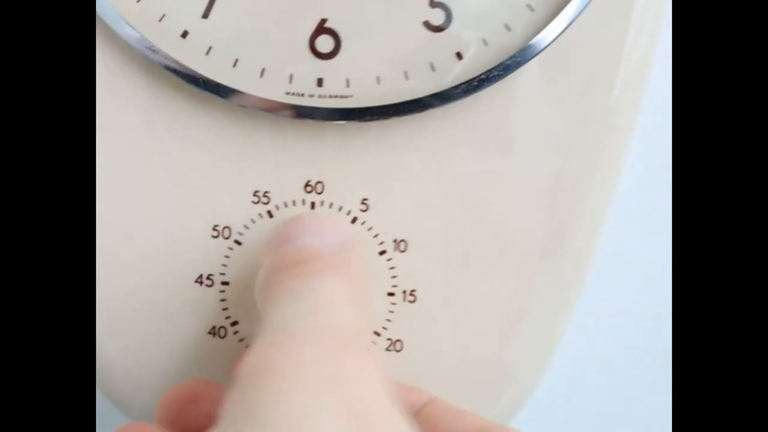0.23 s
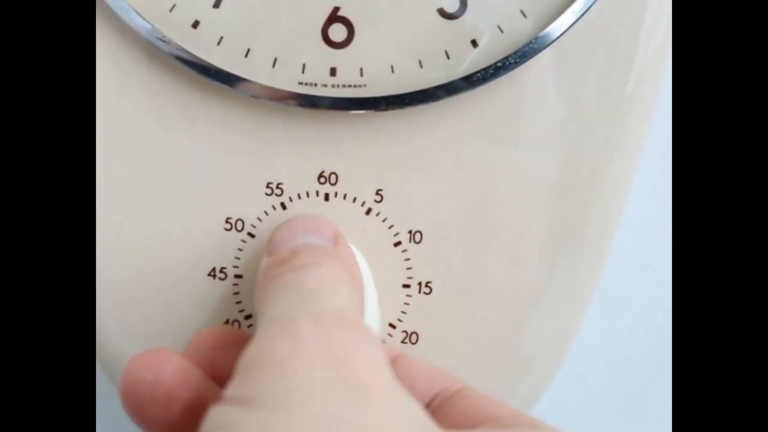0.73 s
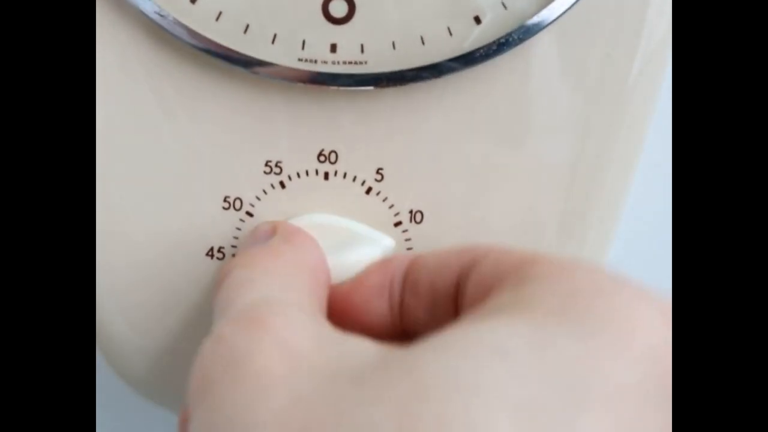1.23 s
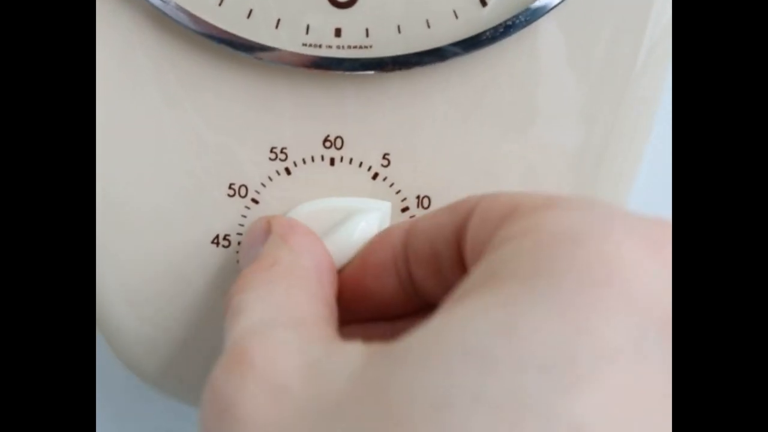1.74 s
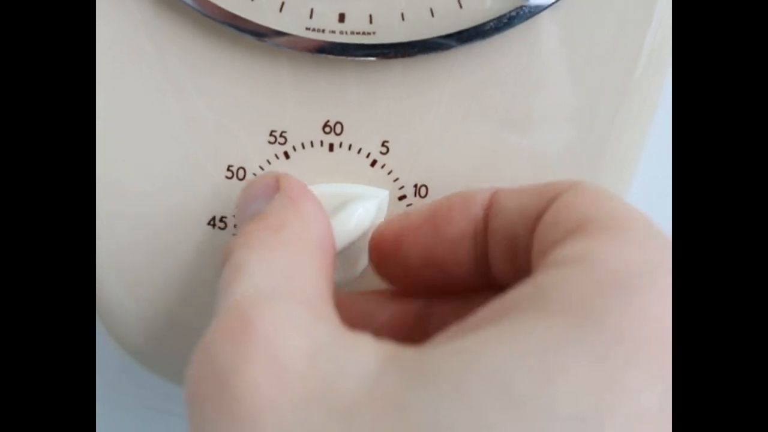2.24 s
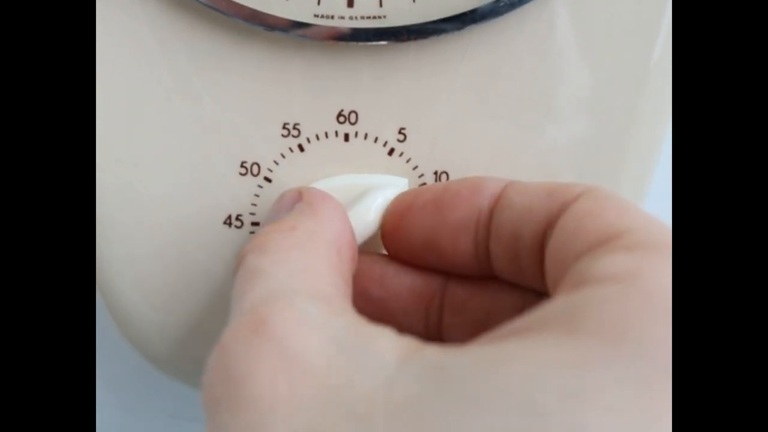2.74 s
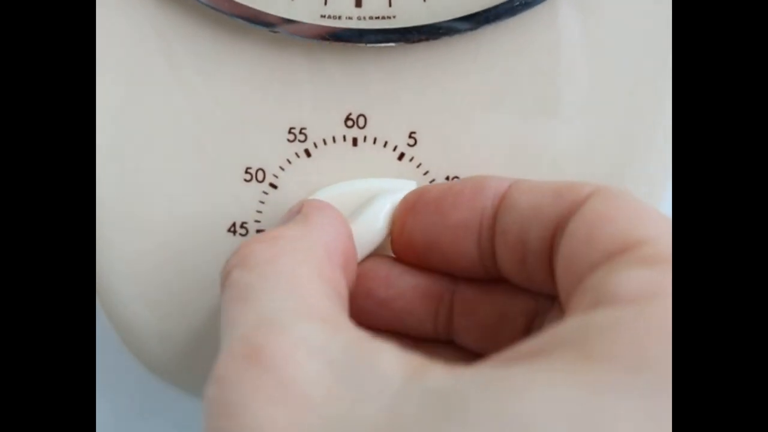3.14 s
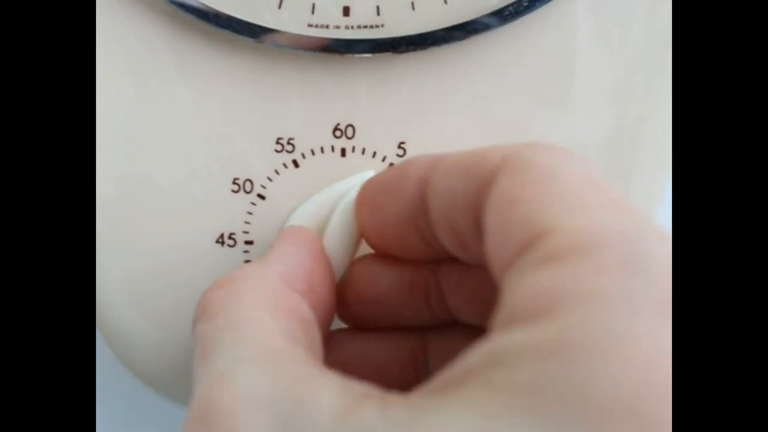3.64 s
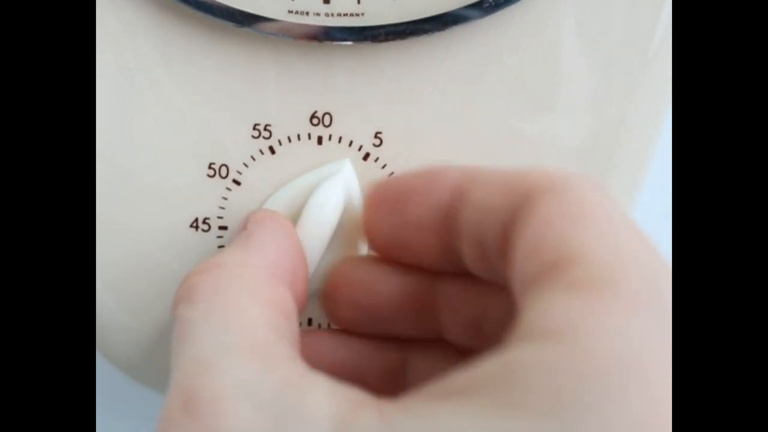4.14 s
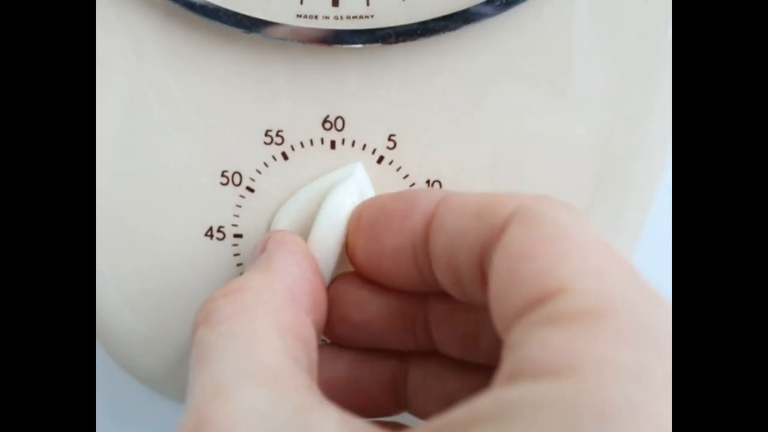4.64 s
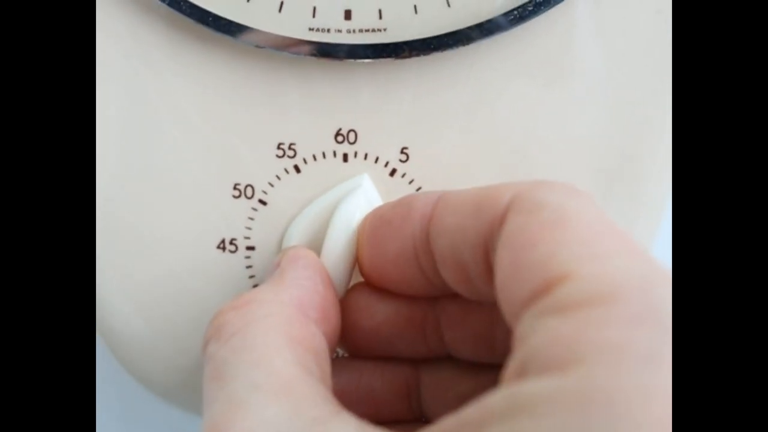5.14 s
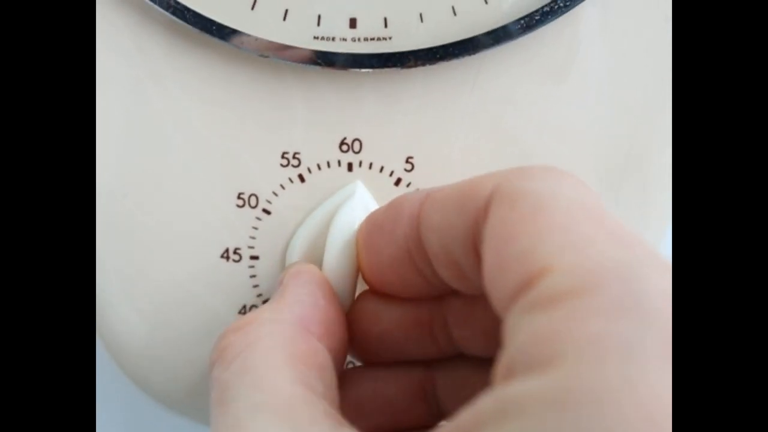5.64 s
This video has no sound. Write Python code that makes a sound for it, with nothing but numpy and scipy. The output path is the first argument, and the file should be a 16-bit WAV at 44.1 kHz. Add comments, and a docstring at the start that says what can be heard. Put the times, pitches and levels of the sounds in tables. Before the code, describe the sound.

Close stereo pickup of a hand on a kitchen clock timer: dull hollow taps of the ceramic case, a dry rapid ratchet rattle lasting under a second, then steady thin metallic ticks. Near the middle a brief slower set of clicks, later isolated knocks. Ticks swell into grainy scrapes under finger load. Faint distant clocks, low room hum, short hard echo; no bell rings.

```python
"""A quiet room with a low hum: close by, a hand winds the knob of a ceramic wall clock's timer.
A pawl dropping over ratchet teeth rings damped plate modes; the case knocks on the wall and rings low and short.
The escapement beats four times a second, by impact and sliding friction, harder when fingers push the knob.
Two other clocks tick faintly through softened contacts; a short noise tail gives the room's echo,
and shaped noise gives its tone, rumble and hum."""
import sys
import numpy as np
from scipy import signal
from scipy.fft import rfft, irfft, next_fast_len
from scipy.io import wavfile
from scipy.ndimage import uniform_filter1d

SR = 44100
rng = np.random.default_rng(int(sys.argv[2]) if len(sys.argv) > 2 else 0)


def attenuation_scalar(level_db):
    """Turn a level in dB into a linear amplitude multiplier (20 dB per decade)."""
    decades = np.asarray(level_db, float) / 20
    return 10 ** decades


def to_wav(s):
    """Save 16-bit WAV."""
    ch = np.atleast_2d(s).T  # columns
    pcm = np.round(np.clip(ch, -1, 1) * 32767)  # PCM
    wavfile.write(sys.argv[1], SR, pcm.astype(np.int16))


N = 259308
T = np.arange(N) / SR  # time_s of each sample

# Spectrum of the steady room tone: pitch_hz, relative density_db
ROOM_TONE = [(15, -17), (25, -21), (108, 1), (457, -3.5), (878, -6), (1090, -8), (1360, -1.5), (1470, -15),
             (1600, -7.5), (2090, -5), (2270, -8), (5270, -14.5), (14000, -25.5), (15200, -29),
             (16500, -45)]
# Likeness of the room tone at left and right: pitch_hz, correlation (-1 to 1)
LIKENESS = [(60, 0.54), (130, 0.74), (290, 0.64), (640, 0.57), (1410, 0.087), (3100, -0.3), (6820, -0.11),
            (15000, -0.16)]
# Course of the rumble: time_s, level_db
RUMBLE = [(0, -56), (.3, -51), (1.15, -50), (1.5, -58), (4.2, -64.5), (5.88, -67)]
# Narrow bands of hum: pitch_hz, width_hz, rms level_db before the slight balance to the left
HUM = [(60, 9.9, -63), (102, 22, -58), (150.8, 7.1, -61), (302, 15.5, -62.5), (1484, 12, -62)]
# Spectrum of first contact before dulling: pitch_hz, level_db
SNAP = [(900, -43), (1300, -18), (2000, -0.5), (3500, 0), (5000, 0.5), (7000, -2), (8500, -10),
        (11500, -15), (15000, -15), (16500, -43)]
# Escapement around the drop, one row for tock and one for tick: unlock_s, slide_start_s, slide_end_s,
# rebound_s, unlock_db (relative to the slide), slide before the drop (0-1)
BEAT_SHAPE = [(-.025, -0.012, 0.012, 0.034, -6, 0.47), (-.017, -0.019, 0.015, 0.037, -19, 0.1)]
# Load of the fingers on the knob, which drives the escapement harder: time_s, load (0-1)
LOAD = [(0, 0.08), (.27, 0.23), (.5, 0.43), (.77, 0.85), (1.3, .9), (1.51, 0.83), (1.77, 0), (2.5, 0.07),
        (2.77, 0.21), (3.01, 0.69), (3.27, 0.75), (3.77, 0.85), (4.0, 0.21), (4.27, 0.27), (4.51, 0.21),
        (4.77, 0.86), (5.5, 1), (5.77, 1)]
# Unloaded beat, tock then tick: relative drop_db, slide_db, rebound_db
IDLE_LEVELS = [(-28, -41.5, -59), (-26, -44, -57.5)]
# What full load adds, tock then tick: drop_db, slide_db, rebound_db
LOAD_GAINS = [(11, 17.1, 22), (14, 16.6, 21)]
# Plate modes driven from the pallets: pitch_hz, width_hz before extra damping, resonance_db
ESCAPEMENT_MODES = [(902, 49, -7.5), (978, 66, -6.5), (1080, 60, -9), (2360, 15, -5), (2496, 18, -6.5),
                    (2656, 81, -5.5), (2847, 19, -2), (3150, 36, -1.5), (3294, 112, -3), (3480, 44, -2.5),
                    (4040, 35, -9), (4570, 53, -6.5), (4760, 80, -8.5), (5460, 74, -12), (6010, 124, -5),
                    (6650, 42, -7), (6860, 40, -13), (7130, 24, -12), (7340, 140, -7), (7770, 61, -29),
                    (9920, 34, -9.5)]
# Free parts that ring on after a beat: pitch_hz, width_hz before extra damping, resonance_db
LINGERING_MODES = [(6670, 12, -3.5), (2960, 16, -3)]
# Other clocks' rhythm: first_beat_s, two_beats_s, second_beat_after_s
CLOCK_TIMES = [(.0947, .4593, .2235), (.3501, .8027, .405)]
# Other clocks' sound: relative first_beat_db, second_beat_db, contact_ms,
# modes (pitch_hz, width_hz, level_db), left_lead_rad
CLOCKS = [(-38.5, -37.5, 3.4, [(2050, 120, 1.5), (2330, 110, 5), (970, 120, 3.5), (1640, 140, -5),
          (3350, 330, -3)], 1.62), (-24.5, -30.5, 5.4, [(3560, 63, -13.5), (5670, 390, 3), (4380, 86, -16),
          (9450, 170, -14.5)], 1.4)]
# Case against the wall: time_s, relative level_db, upper_modes_db
KNOCKS = [(0.121, -16.5, -10.5), (0.21, -34, 7), (0.386, -2, 3.5), (0.497, -15, -9), (0.687, -8.5, -2.5),
          (0.801, -15, -36), (2.684, -4.5, -4), (2.739, -10, -6.5), (3.486, -21.5, 4), (4.193, -5.5, -2.5),
          (4.488, -2.5, 3.5), (5.806, -30, -5)]
# Modes of the ceramic case: pitch_hz, relative level_db, t60_s
CASE_MODES = [(297.2, -22, 0.25), (382, -19.5, 0.11), (418.3, -19.5, 0.093), (441.4, -13, 0.086),
              (501, -25, 0.11), (529, -26, 0.047), (605, -20, 0.041), (680.3, -24.5, 0.12),
              (770, -16.5, 0.012), (773, -21, 0.053), (903, -12.5, 0.037), (938, -23.5, 0.071),
              (1043, -10.5, 0.04), (1074, -21.5, 0.1), (1304, -26, 0.12)]
# Plate modes driven from the pawl: pitch_hz, width_hz before extra damping, resonance_db
RATCHET_MODES = [(1003, 82, -4), (1298, 19, -8), (1946, 78, -1.5), (2280, 60, -6), (2513, 20.5, 4.5),
                 (2870, 46, 2), (3220, 49, -8.5), (3530, 71, -1.5), (4504, 180, -1), (4870, 65, -7),
                 (5300, 170, -6.5), (5780, 53, -18), (6025, 104, -8), (7000, 210, -11.5), (8120, 48, -18),
                 (9200, 190, -16), (9640, 81, -16), (10140, 43, -10.5), (11100, 57, -18)]
# Pawl drops: time_s, relative level_db
PAWL = [(0.6515, -13), (0.6761, -17.5), (0.6815, -13), (0.7622, -12.5), (0.7878, -13.5), (0.7907, -13.5),
        (0.815, -11), (0.8576, -12.5), (0.8892, -12.5), (0.907, -11.5), (0.9508, -12), (0.9844, -19.5),
        (1.0013, -9.5), (1.0216, -10), (1.044, -9.5), (1.096, -22.5), (1.1126, -11.5), (1.136, -10.5),
        (1.1647, -14.5), (1.1945, -13.5), (1.2189, -12), (1.245, -12), (1.2739, -14.5), (1.2982, -11.5),
        (1.3285, -13.5), (1.354, -10.5), (1.3795, -11.5), (1.4076, -11.5), (3.2082, -15.5), (3.251, -12),
        (3.3416, -12), (3.3942, -14), (3.467, -14), (3.4875, -21), (3.5217, -15.5)]
# Turns of the knob: start_s, end_s, relative shaft_rub_db, case_thump_db (relative to each pawl drop)
TURNS = [(0.661, 1.428, -40, -10), (3.2, 3.548, -52.5, -16.5)]


def shape(x, points):
    """Linear filtering: weights the spectrum by (Hz, gain) points joined on a log-frequency axis."""
    hz, gain = np.transpose(points)
    size = next_fast_len(x.shape[-1])
    bins_hz = np.fft.rfftfreq(size, 1 / SR)
    weight = np.interp(np.log(bins_hz + 1), np.log(hz), gain)
    return irfft(rfft(x, size) * weight, size)[..., :x.shape[-1]]


def unit(x):
    """Normalization of power: scales a signal to rms 1."""
    return x / np.sqrt(np.mean(x ** 2))


def walk(rate):
    """Slow random fluctuation: noise averaged twice over 1 / rate seconds, with spread 1."""
    size = int(SR / rate)
    smooth = uniform_filter1d(rng.standard_normal(N), size)
    return unit(uniform_filter1d(smooth, size))


def blows(times, gains, push_ms):
    """Impulse of a contact force: smooth one-sided pushes whose area is their gain."""
    out = np.zeros(N)
    for s, gain, ms in zip(times, gains, np.broadcast_to(push_ms, len(times))):
        push = np.hanning(max(int(ms * SR / 1000), 1) + 2)[1:-1]
        start = int(np.clip(s * SR, 0, N - len(push)))
        out[start:start + len(push)] += gain * push / push.sum()
    return out


def chatter(times, db, decay_ms):
    """Exponential relaxation: envelope of contacts that start at once and die away."""
    return signal.lfilter([1], [1, -np.exp(-1000 / decay_ms / SR)], blows(times, attenuation_scalar(db), .05))


def mode(force, hz, width_hz, lead, pan_db):
    """Damped resonance: a force rings one mode, with a phase lead (rad) and level excess at the left."""
    pole = np.exp((2j * np.pi * hz - np.pi * width_hz) / SR)
    z = signal.lfilter([1], [1, -pole], force + 0j)
    side = np.array([[.5], [-.5]])
    return np.imag(z * np.exp(1j * lead * side)) * attenuation_scalar(pan_db * side)


def plates(modes, times, db, contact, spread, pan_db, damping, tilt_db=0):
    """Modal superposition: blows ring the modes much alike each time, rough contact by chance."""
    out, chance = 0, rng.standard_normal((len(times), len(modes)))
    for k, (hz, width, m_db) in enumerate(modes):
        # tilt_db is per octave above 3 kHz
        rough = contact * attenuation_scalar(tilt_db * max(np.log2(hz / 3000), 0)) * rng.standard_normal(N)
        impact = blows(times + (k % 3) * .0003, attenuation_scalar(db + 2 * chance[:, k]), .05)
        force = (-1) ** k * impact + rough
        lead = spread * np.sin(2.355 * k) - .3  # each mode radiates its own way
        out = out + attenuation_scalar(m_db) * width / 100 * mode(force, hz, damping * width, lead, pan_db)
    return signal.sosfilt(signal.butter(3, 750, "high", fs=SR, output="sos"), out)


def crack(times, db, decay_ms, pan_db, dull_hz):
    """Broadband impact noise: the snap of first contact, its treble falling above dull_hz."""
    noise = 0.39 * rng.standard_normal(N) + 0.79 * rng.standard_normal((2, N))  # partly alike left and right
    colour = [(hz, attenuation_scalar(c_db) / (1 + (hz / dull_hz) ** 2)) for hz, c_db in SNAP]
    return shape(chatter(times, db, decay_ms) * noise, colour) * attenuation_scalar(pan_db * np.array([[.5], [-.5]]))


def case(times, db, middle_db, upper_db, push_ms, scatter_db, rub):
    """Modes of a stiff shell: the ceramic rings low and short; middle and upper modes take their own levels,
    and higher modes lean right."""
    out, chance = 0, rng.standard_normal((len(times), len(CASE_MODES)))
    for k, (hz, m_db, t60) in enumerate(CASE_MODES):
        tilt_db = middle_db * (600 < hz < 760) + upper_db * (hz > 760)
        impact = blows(times, attenuation_scalar(db + tilt_db + scatter_db * chance[:, k]), push_ms)
        force = impact + rub * rng.standard_normal(N) * 400 / hz
        width_hz = np.log(1000) / np.pi / t60
        out = out - attenuation_scalar(m_db) * mode(force, hz, width_hz, -hz / 6000, -.8 * hz / 1000)
    small_body = signal.butter(7, 341, "high", fs=SR, output="sos")  # a small case radiates little lower
    padding = signal.butter(2, 1170, fs=SR, output="sos")  # a padded contact excites little higher
    return signal.sosfilt(np.r_[small_body, padding], out)


def background():
    """Stationary noise: room tone most alike left and right in the bass, rumble and wavering hum."""
    mid, side, low = rng.standard_normal((3, N))
    mid = shape(mid, [(hz, np.sqrt((1 + np.clip(c, -1, 1)) / 2)) for hz, c in LIKENESS])
    side = shape(side, [(hz, np.sqrt((1 - np.clip(c, -1, 1)) / 2)) for hz, c in LIKENESS])
    tone_hz, tone_db = np.transpose(ROOM_TONE)
    fine_hz = np.geomspace(tone_hz[0], tone_hz[-1], num=80)
    colour = np.c_[fine_hz, attenuation_scalar(np.interp(np.log(fine_hz), np.log(tone_hz), tone_db))]
    drift_db = .8 * walk(1.5)
    tone = attenuation_scalar(-49 + drift_db) * unit(shape(np.array([mid + side, mid - side]), colour))
    rumble_colour = [(30, 0.05), (46, 0.57), (58, 1), (74, 0.095), (90, 0.09), (170, 0.23), (230, 0.0058)]
    rumble = attenuation_scalar(np.interp(T, *np.transpose(RUMBLE))) * unit(shape(low, rumble_colour))
    hum = sum(attenuation_scalar(db) * unit(mode(rng.standard_normal(N), hz, width, hz / 2500, 0)) for hz, width, db in HUM)
    return (tone + rumble + hum) * attenuation_scalar(np.array([[.4], [-.4]]))


def escapement():
    """Impact and sliding friction: each beat unlocks, slides, drops and rebounds, harder under load."""
    first_tock_s, two_beats_s, tick_after_s = .0075, .5003, .259
    beat = np.arange(4 * N // SR + 1)
    kind = beat % 2  # 0 tock, 1 tick
    s = first_tock_s + beat // 2 * two_beats_s + kind * tick_after_s
    load = np.clip(np.interp(s, *np.transpose(LOAD)), 0, 1.3)
    levels_db = np.array(IDLE_LEVELS)[kind] + load[:, None] * np.array(LOAD_GAINS)[kind]
    drop_db, slide_db, rebound_db = levels_db.T
    unlock, start, end, rebound, unlock_db, early = np.array(BEAT_SHAPE)[kind].T

    # the tooth slides along the pallet, then rebounds
    slide = np.zeros(N)
    for k in range(len(s)):
        corners_s = [start[k] - .001, start[k], -.0005, 0, end[k], end[k] + 0.0056]
        course = np.interp(T - s[k], corners_s, [0, early[k], early[k], .6, 1, 0])
        slide += attenuation_scalar(slide_db[k]) * course
        slide += attenuation_scalar(rebound_db[k]) * np.exp(-((T - s[k] - rebound[k]) / 0.0089) ** 2)
    grainy = slide * attenuation_scalar(4 * walk(400) - 24)

    times, level_db = np.r_[s, s + unlock], np.r_[drop_db, slide_db + unlock_db] - 11
    # tilt: a slide wakes the higher modes less
    ring = plates(ESCAPEMENT_MODES + LINGERING_MODES, times, level_db, grainy,
                  spread=1.3, pan_db=-1.5, damping=1.32, tilt_db=-3)
    snap = crack(s, drop_db - 1.5, decay_ms=2.6, pan_db=-8.5, dull_hz=8600)
    snap = shape(snap, [(1400, .1), (5600, 1)])  # the drop's snap has little body
    rattle_db = np.r_[drop_db - 9, slide_db + unlock_db - 2.5]
    rattle = crack(np.r_[s, s + start], rattle_db, decay_ms=11.8, pan_db=-9.0, dull_hz=6000)

    # a spring's thin tone swells 35 ms before each tick
    bowed = sum(np.exp(-((T - tick + .035) / .014) ** 2) for tick in s[kind == 1])
    spring = mode(attenuation_scalar(-69.5) * bowed * rng.standard_normal(N), 4409, 27, lead=2.59, pan_db=-2.0)
    return ring + snap + spring + rattle


def room(x):
    """Reverberation: the echo tail of a small hard room, duller as it dies, different left and right."""
    t60_s, treble_t60_s, wet_db = 0.55, 0.13, -11
    t = T[:int(.6 * SR)]
    noise = 0.87 * rng.standard_normal(len(t)) + 0.57 * rng.standard_normal((2, len(t)))
    lasting = shape(noise, [(700, 1), (1600, 0.78)])  # the rest, a share of the treble, dies sooner
    tail = lasting * attenuation_scalar(-60 * t / t60_s) + (noise - lasting) * attenuation_scalar(-60 * t / treble_t60_s)
    tail = tail * np.clip(t / 0.00092, 0, 1)
    tail = tail / np.sqrt(np.sum(tail[0] ** 2))
    return attenuation_scalar(wet_db) * signal.fftconvolve(x.mean(axis=0)[None], tail, axes=1)[:, :N]


def clocks():
    """Soft impact on resonances: two distant movements beat unevenly, softened by the way they travel."""
    out = 0
    for (first, pair, after), (db, second_db, contact_ms, modes, lead) in zip(CLOCK_TIMES, CLOCKS):
        s = np.arange(first, T[-1] - after, pair)
        scatter_db = 1.5 * rng.standard_normal(2 * len(s))
        times = np.r_[s, s + after]
        level_db = np.r_[db + 0 * s, second_db + 0 * s] + scatter_db
        push = blows(times, attenuation_scalar(level_db), contact_ms)
        out = out + crack(times, level_db - 11, decay_ms=8.5, pan_db=-3.0, dull_hz=9000)
        for hz, width, m_db in modes:
            force = push * np.cos(2 * np.pi * hz * T)  # the soft push, carried up to the mode's pitch
            out = out + attenuation_scalar(m_db) * mode(force, hz, width, lead, -0.89)
    return out


def knocks():
    """Collision and transmitted shock: the case meets the wall and the jolt shakes the plates inside."""
    s, db, upper_db = np.transpose(KNOCKS)
    # harder knocks press longer and wake the middle modes
    push_ms = 1 + 0.12 * db
    middle_db = np.clip(12.5 + 1.02 * db, -11, 9.5)
    body = case(s + 0.001366, db, middle_db, upper_db, push_ms, scatter_db=1.5, rub=0)
    shake = chatter(s + 0.0011, db + upper_db - 49, decay_ms=12.7)
    low_plates = [m for m in RATCHET_MODES if m[0] < 4000]
    jolt = plates(low_plates, s + 0.00101, db + upper_db - 43, shake, spread=1.54, pan_db=-5.0, damping=1.9)
    return body + jolt


def winding():
    """Repeated impact: the pawl snaps down and bounces once, thumping the case; the shaft rubs faintly."""
    s, db = np.transpose(PAWL)
    start, end, rub_db, thump_db = np.transpose(TURNS)
    rub = sum(attenuation_scalar(r_db + 4.0 * walk(21)) * (T > a) * (T < b) for a, b, r_db in zip(start, end, rub_db))
    turn = np.searchsorted((end[:-1] + start[1:]) / 2, s)  # which turn each drop belongs to
    bounce_times, bounce_db = np.r_[s, s + .0025], np.r_[db, db - 4] - 15.5
    ring = plates(RATCHET_MODES, bounce_times, bounce_db, attenuation_scalar(-29.0) * rub,
                  spread=1.27, pan_db=-3.5, damping=1.15)
    thump = case(s + 0.0014, db + thump_db[turn], middle_db=0 * s - 3, upper_db=0 * s - 4,
                 push_ms=0.52, scatter_db=3.5, rub=attenuation_scalar(-14.5) * rub)
    # the snap is a bright instant followed by a short dense rattle
    instant = crack(s, db - 1.5, decay_ms=0.78, pan_db=2.0, dull_hz=19000)
    rattle = crack(s, db - 6.5, decay_ms=10.0, pan_db=-4.0, dull_hz=6700)
    return ring + thump + instant + rattle


def scene():
    """Superposition: timer, case and clocks add to their echo and to the background."""
    near = winding() + escapement() + knocks() + clocks()
    return near + room(near) + background()


def band_limit(x):
    """A steep low-pass at the top of the band."""
    return signal.sosfilt(signal.butter(12, 16820, fs=SR, output="sos"), x)


def record(dry):
    """Linear superposition is complete: the finished mix passes on at its own level."""
    return band_limit(dry)


dry = scene()
out = record(dry)
to_wav(out)
```